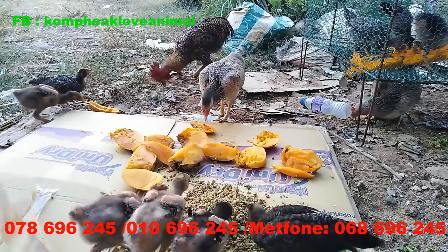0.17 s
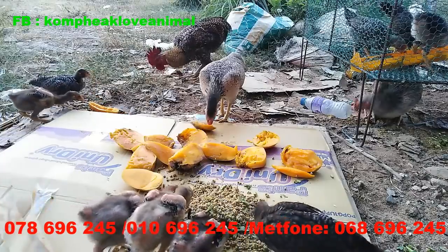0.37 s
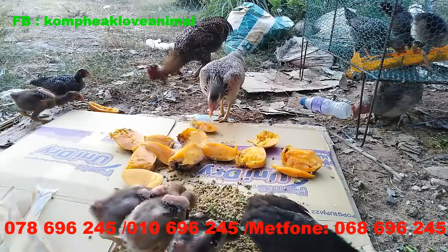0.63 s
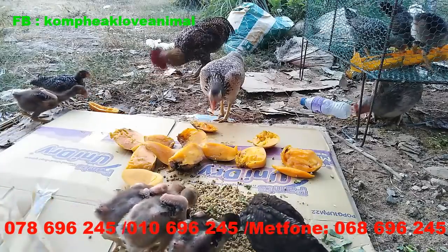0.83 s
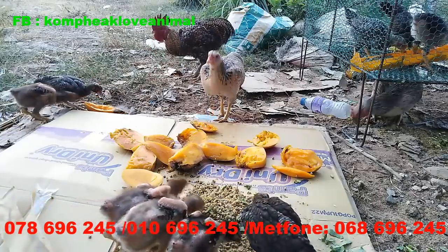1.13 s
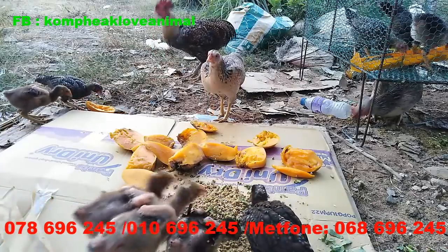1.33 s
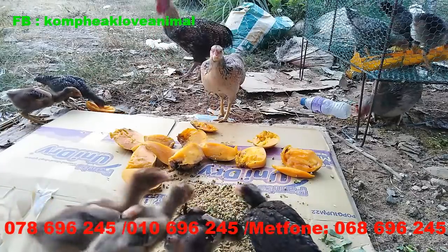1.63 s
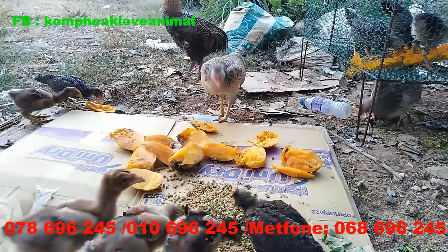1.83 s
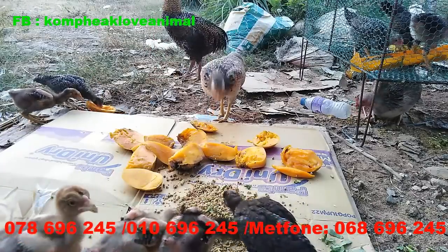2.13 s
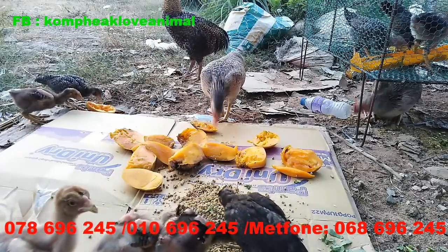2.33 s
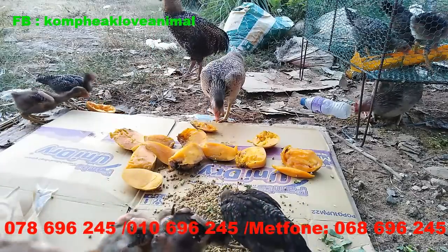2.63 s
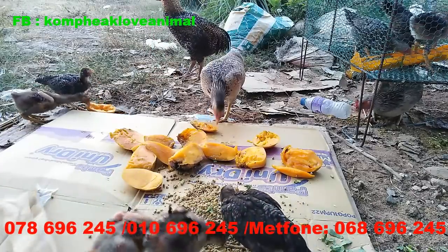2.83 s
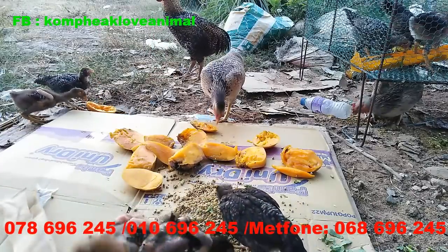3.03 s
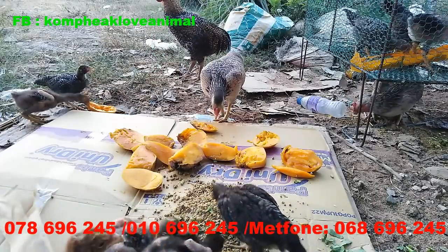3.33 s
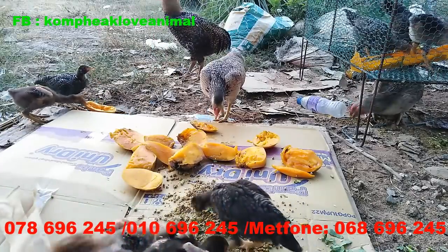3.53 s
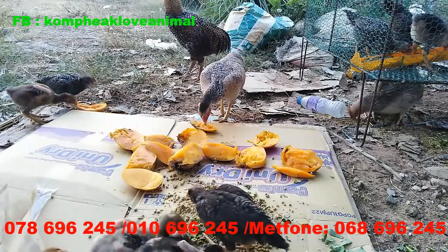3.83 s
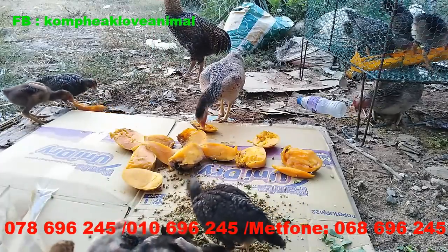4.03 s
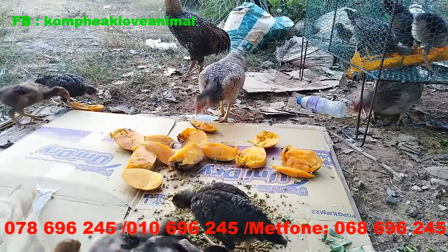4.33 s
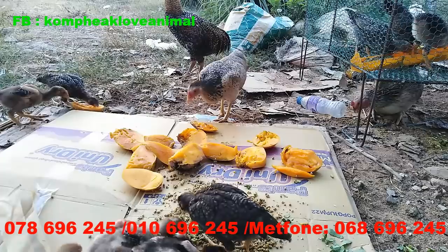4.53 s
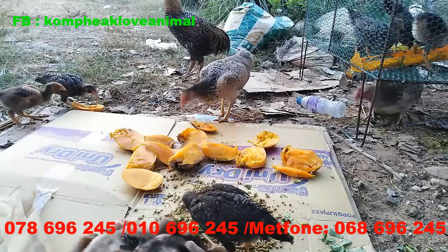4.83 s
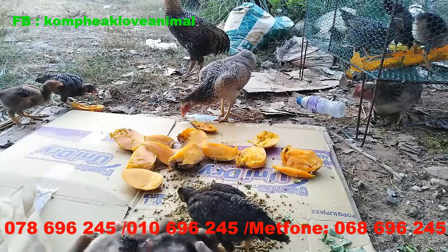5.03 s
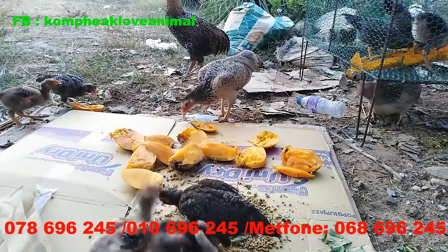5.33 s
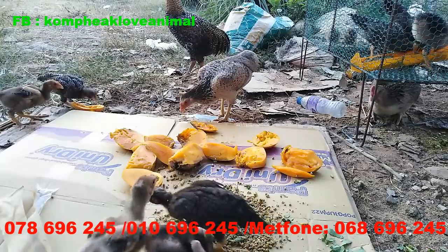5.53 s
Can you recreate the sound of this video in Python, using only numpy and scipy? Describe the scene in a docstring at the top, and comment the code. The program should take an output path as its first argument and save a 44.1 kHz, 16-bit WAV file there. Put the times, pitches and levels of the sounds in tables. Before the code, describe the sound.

Chickens feed on flattened cardboard outdoors, close to the microphone, over faint hiss and a barely audible distant motor. From the start, chicks give short, high peeps, many sliding downward, mostly a little to the right. Beaks knock hollowly on the card at uneven intervals from about 0.5 to 1.8 seconds, and dry pellets click and rattle, with the sharpest cracks near 1.3 and 1.5 seconds. After a slightly quieter moment, a burst of crunching and scattering feed comes at 2.8 seconds. The peeps then grow louder and more regular, and the pecking resumes from 3.2 seconds on. A foot lands on the sheet with a dull thump at about 4.2 seconds. A claw drags softly across the card around 5 seconds. Hens, only faint earlier, give several short clucks from 4.7 seconds to the end, near 5.7 seconds.

```python
"""Chickens feeding on cardboard

Chicks and hens feed on a flattened box outdoors, close to a stereo microphone. Beaks ring
the card's modes and crack dry pellets; feet boom the sheet and stir the feed; a claw drags
over the ribs. Chicks peep and hens cluck in short gliding tones. A far bird whines and a
distant motor hums under faint air."""
import sys
import numpy as np
from scipy import signal
from scipy.fft import rfft, irfft, next_fast_len
from scipy.io import wavfile
from scipy.ndimage import uniform_filter1d, map_coordinates

SR = 44100
rng = np.random.default_rng(int(sys.argv[2]) if len(sys.argv) > 2 else 0)


def unload_audio(sound):
    """Save the sound as a 16-bit wav file, at the path given as the first command line argument."""
    columns = np.transpose(np.atleast_2d(sound))
    # keep every value between -1 and 1, then stretch to whole-number steps
    steps = np.round(np.clip(columns, -1, 1) * 32767)
    wavfile.write(sys.argv[1], SR, steps.astype(np.int16))


N = 250488


def amp(db):
    return 10 ** (np.asarray(db) / 20)


def unit_rms(x):
    return x / np.sqrt(np.mean(x ** 2) + 1e-20)


def decay(t, t60_s):
    return amp(-60 * t / t60_s)


def along(points, hz):
    """Interpolate (f/Hz, value) points on a log axis."""
    f, v = np.transpose(points)
    return np.interp(np.log(hz + 1), np.log(f + 1), v)


def curves(rows):
    """Per-sample curve for each column after t/s."""
    s, *cols = np.transpose(rows)
    return [np.interp(np.arange(N) / SR, s, c) for c in cols]


def wobble(rate_hz, size=N):
    """Smooth random curve, knots at rate_hz."""
    knots = rng.standard_normal(int(size * rate_hz / SR) + 4)
    return map_coordinates(knots, [np.arange(size) * rate_hz / SR])


def filtered(x, response):
    """Apply the gain response(f/Hz)."""
    m = next_fast_len(N + SR // 2)
    return irfft(rfft(x, m) * response(np.fft.rfftfreq(m, 1 / SR)), m)[..., :N]


def place(out, s, x, pan_db):
    """Mix x in at time s, panned by level and delay; pan_db is left minus right."""
    lag = round(np.clip(5 - pan_db * 1.2, -12, 10))
    for side, sign in enumerate((1, -1)):
        part = out[side, round(s * SR) + max(sign * lag, 0):][:len(x)]
        part += amp(sign * pan_db / 2) * x[:len(part)]


def rush(spectrum, correlation, grain_db, patch_db, pan_db):
    """Stereo noise with millisecond grains and patches of colour; rms 1 before panning."""
    z = signal.stft(amp(grain_db * wobble(700)) * rng.standard_normal((2, N)), nperseg=256)[2]
    patches = uniform_filter1d(rng.standard_normal(z.shape[1:]), size=4, axis=0)
    patches = unit_rms(uniform_filter1d(patches, size=12, axis=1))
    pair = signal.istft(z * amp(patch_db * patches), nperseg=256)[1][:, :N]
    mid, side = filtered(pair, lambda hz: amp(along(spectrum, hz)))
    angle = np.arccos(correlation) / 2
    stereo = np.cos(angle) * mid + np.sin(angle) * np.outer([1, -1], side)
    return unit_rms(stereo) * amp([[pan_db / 2], [-pan_db / 2]])


def ring(modes, t):
    """Damped modes; level and tuning vary per blow."""
    return sum(amp(db + rng.normal(0, 2)) * decay(t, t60_s)
               * np.sin(2 * np.pi * hz * rng.normal(1, .06) * t) for hz, db, t60_s in modes)


def air():
    """Faint outdoor hiss."""
    # air spectrum: f/Hz, relative density/dB
    spectrum = [(200, 23), (1000, 22), (2800, 8.5), (14000, -22)]
    return amp(-80) * rush(spectrum, correlation=.19, grain_db=2.5, patch_db=5, pan_db=3.5)


def motor():
    """A far motor throbs: low noise of wavering level."""
    # hum envelope: t/s, level/dB
    envelope = [(0, -49.5), (.15, -64), (2.6, -62), (2.9, -54.5), (3.5, -59), (5.68, -65)]
    # hum spectrum: f/Hz, relative density/dB
    spectrum = [(20, -31), (70, -0.5), (95, 3.5), (125, -4.5), (250, -22.5), (450, -51)]
    throb = amp(curves(envelope)[0] + 3 * wobble(10))
    return throb * rush(spectrum, correlation=.8, grain_db=0, patch_db=0, pan_db=-4)


def far_bird():
    """A thin whine: wavering overtones, no fundamental."""
    # call contour: t/s, f/Hz, level/dB
    contour = [(2.26, 380, -94), (2.4, 405, -82), (2.53, 426, -85), (2.66, 432, -100)]
    # overtones: harmonic number, gain/dB
    overtones = [(3, 8), (4, 16), (5, 16)]
    hz, db = curves(contour)
    phase = 2 * np.pi * np.cumsum(hz * (1 + .018 * wobble(150))) / SR
    tone = sum(amp(gain_db + 6.5 * wobble(90)) * np.sin(k * phase) for k, gain_db in overtones)
    sounding = db > db[0]
    return sounding * amp(db) * tone * amp([[-2.5], [2.5]])


def claw_drag():
    """A claw catches and slips over the ribbed card."""
    # scrape spectrum: f/Hz, relative density/dB
    spectrum = [(150, -19.5), (400, 0.5), (850, -0.5), (1450, -8.5), (1900, 1), (2700, -27), (4500, -36)]
    start_s, end_s, rise_db_per_s, fall_db_per_s = 4.868, 5.24, 901, 209
    t = np.arange(N) / SR
    fade_db = rise_db_per_s * (start_s - t).clip(0) + fall_db_per_s * (t - end_s).clip(0)
    envelope = amp(-48.5 - fade_db + 1.5 * wobble(60))
    return envelope * rush(spectrum, correlation=.7, grain_db=3, patch_db=3.2, pan_db=-3)


def feed_rattle():
    """Feet and beaks sweep the feed: pellets rattle, single ones tick as they jump."""
    # sweeps: peak t/s, level/dB, 30 dB rise/s, 30 dB fall/s
    sweeps = [(0.002, -53, 0.0025, 0.17), (0.331, -46.5, 0.013, 0.13), (0.568, -48.5, 0.35, 0.74),
              (0.931, -46, 0.33, 0.17), (1.282, -55.5, 0.08, 0.079), (1.464, -47.5, 0.47, 0.07),
              (1.546, -42.5, 0.0078, 0.28), (1.773, -49.5, 0.014, 0.11), (2.057, -51, 0.038, 0.12),
              (2.261, -47, 0.44, 0.35), (2.824, -34.5, 0.074, 0.26), (2.986, -39, 0.24, 0.15),
              (3.119, -42, 0.048, 0.082), (3.257, -46, 0.32, 0.14), (3.414, -42.5, 0.047, 0.61),
              (3.821, -43, 0.048, 0.049), (3.944, -51, 0.092, 0.24), (4.174, -49.5, 0.0073, 0.23),
              (4.275, -38, 0.013, 0.11), (4.381, -42, 0.11, 0.12), (4.569, -53, 0.024, 0.34),
              (4.74, -49.5, 0.013, 0.059), (5.122, -52.5, 0.012, 0.21), (5.349, -41, 0.0084, 0.16),
              (5.49, -49.5, 0.011, 1), (5.625, -42.5, 0.059, 0.11)]
    # pellet spectrum: f/Hz, relative density/dB
    spectrum = [(180, -47), (300, -9.5), (1100, -11), (4910, -2.5), (13800, -12.5)]
    ticks_per_s, tick_db, spread_db, highpass_hz = 90, -5.5, 4.5, 3000
    t = np.arange(N) / SR
    power = sum(amp(db - 30 * np.maximum((s - t) / rise_s, (t - s) / fall_s)) ** 2
                for s, db, rise_s, fall_s in sweeps)
    jumps = rng.random(N) < ticks_per_s / SR
    jumps = jumps * amp(tick_db + spread_db * rng.exponential(size=N).clip(0, 3))
    bursts = signal.fftconvolve(jumps, decay(t[:SR // 40], t60_s=.008))[:N]
    ticks = bursts * (rng.standard_normal(N) + .72 * rng.standard_normal((2, N)))
    ticks = filtered(ticks, lambda hz: amp(along(spectrum, hz)) * (1 - 1 / (1 + (hz / highpass_hz) ** 4)))
    shiver = amp(3.5 * wobble(55))
    rattle = shiver * rush(spectrum, correlation=.15, grain_db=.5, patch_db=4, pan_db=-2.5)
    return np.sqrt(power) * (rattle + 3 * ticks * amp([[-1.5], [1.5]]))


def pellet_clicks():
    """A pellet cracks: brief ring, broad snap, crunch of crumbs; brighter ones lie further right."""
    # cracks: t/s, level/dB, f/Hz
    cracks = [(0.3366, -23, 7500), (0.451, -68, 11980), (0.61, -24.5, 6800), (0.6784, -24, 4660),
              (0.728, -23.5, 5130), (0.879, -35.5, 7100), (1.3421, -10.5, 9300), (1.5273, -35, 7140),
              (1.545, -13, 5900), (1.549, -20, 5500), (1.574, -25, 6500), (1.621, -32.5, 8000),
              (1.723, -30, 6660), (2.025, -38, 4970), (2.0477, -30, 7560), (2.742, -32, 4590),
              (2.809, -27, 4370), (2.8358, -14.5, 4460), (2.8506, -20, 4160), (2.8637, -15.5, 4140),
              (3.4154, -28.5, 6630), (3.635, -26.5, 6530), (3.822, -28, 6030), (3.9503, -26, 6990),
              (4.275, -27, 4140), (5.2733, -34.5, 6900), (5.352, -18, 7030), (5.4904, -38, 5280)]
    out, t = np.zeros((2, N)), np.arange(SR // 40) / SR
    for s, db, hz in cracks:
        tone = np.sin(2 * np.pi * hz * t)
        snap = .4 * np.diff(rng.standard_normal(len(t) + 1))
        crack = amp(db) * decay(t, t60_s=.003) * (tone + snap)
        crumbs = uniform_filter1d(rng.standard_normal(len(t)), size=8)
        crunch = amp(-35) * decay(t, t60_s=.038) * tone * crumbs
        place(out, s, crack + crunch, pan_db=7 - hz / 500)
    return out


def footsteps():
    """A landing foot booms the whole sheet."""
    # landings: t/s, level/dB
    landings = [(3.421, -39), (4.176, -28.5)]
    # whole-sheet modes: f/Hz, gain/dB, t60/s
    sheet_modes = [(144, -16, 0.23), (213, 0, 0.087), (280, -2, 0.12)]
    out, t = np.zeros((2, N)), np.arange(SR // 6) / SR
    attack = 1 - np.exp(-t / .0033)
    for s, db in landings:
        place(out, s, amp(db) * ring(sheet_modes, t) * attack, pan_db=-1.5)
    return out


def beak_knocks():
    """A blow rings the low box modes; hardness adds panel modes and a dry puff."""
    # blows: t/s, relative level/dB, hardness/dB
    blows = [(0.499, -24.5, -5.5), (0.858, -32, -9), (0.908, -27, -1), (0.934, -31.5, -1.5),
             (1.013, -33, 5), (1.266, -62.5, 19.5), (1.415, -37.5, -9), (1.778, -35.5, -1),
             (3.197, -30, -6.5), (3.422, -45, 18), (3.63, -32.5, -8.5), (3.828, -44.5, -29),
             (4.138, -33, -6.5), (4.176, -27, 2), (4.377, -39, 10.5), (4.686, -41, 0.5),
             (4.763, -33.5, 8.5), (4.843, -45, -12), (4.972, -44.5, 12), (5.397, -32.5, -10)]
    # low card modes: f/Hz, gain/dB, t60/s
    box_modes = [(365, 0, .06), (440, -2, .075), (290, -10, .05)]
    # higher panel modes: f/Hz, gain/dB, t60/s
    panel_modes = [(720, 0, .025), (1090, 2, .025), (1500, 0, .02), (2000, -3, .015)]
    out, t = np.zeros((2, N)), np.arange(SR // 6) / SR
    attack = 1 - np.exp(-t / .0006)
    for s, db, hard_db in blows:
        puff = amp(6) * decay(t, t60_s=.02) * uniform_filter1d(rng.standard_normal(len(t)), size=7)
        knock = ring(box_modes, t) + amp(hard_db - 2) * (ring(panel_modes, t) + puff)
        place(out, s, amp(db - 3) * knock * attack, pan_db=-1.5)
    highpass_hz = 170  # a beak is too light to move the whole sheet
    return filtered(out, lambda hz: (1j * hz / (highpass_hz + 1j * hz)) ** 2)


def distant(note):
    """A far call arrives mostly as reflections."""
    t = np.arange(SR // 4) / SR
    response = rng.standard_normal(len(t)) * decay(t, t60_s=.1)
    response *= .44 / np.linalg.norm(response)
    response[0] = .4  # direct path
    return signal.fftconvolve(note, response)


def call(length_s, start_hz, end_hz, sag_hz, overtones_db, flutter_db, jitter, rasp, peak_at):
    """A whistled glide that swells, flutters and fades; rasp spreads noise around each partial."""
    n = round(length_s * SR)
    u = np.linspace(0, 1, n)
    hz = start_hz + (end_hz - start_hz) * u - 4 * sag_hz * u * (1 - u)
    hz -= .8 * max(start_hz - end_hz, 0) * np.exp(-u * length_s / .002)  # falling notes flick up first
    phase = 2 * np.pi * np.cumsum(hz * (1 + jitter * wobble(305.7, n))) / SR
    tone = np.sin(phase) + sum(amp(db) * np.sin(k * phase) for k, db in enumerate(overtones_db, 2))
    tone *= 1 + rasp * wobble(1400, n)
    swell = np.sin(np.pi / 2 * np.interp(u, [0, peak_at, 1], [0, 1, 0])) ** .7
    flutter = amp(flutter_db * (wobble(80, n) + wobble(450, n)))
    return np.sqrt(2) * swell * flutter * tone


def hens():
    """Low clucks that make most of their glide early."""
    # clucks: t/s, length/s, start f/Hz, end f/Hz, level/dB
    clucks = [(1.152, 0.041, 1073, 1060, -55.5), (3.05, 0.088, 958, 934, -61), (3.887, 0.14, 942, 960, -56),
              (3.935, 0.013, 840, 850, -45.5), (4.732, 0.0374, 1326, 999, -29),
              (5.026, 0.094, 860, 880, -48.5), (5.149, 0.033, 1220, 1162, -45),
              (5.363, 0.03, 1603, 1092, -33), (5.516, 0.028, 1510, 1494, -38),
              (5.569, 0.065, 1173, 1120, -36.5), (5.589, 0.052, 730, 697, -56.5)]
    out = np.zeros((2, N))
    for s, length_s, start_hz, end_hz, db in clucks:
        sag_hz = .353 * (start_hz - end_hz)
        note = call(length_s, start_hz, end_hz, sag_hz, overtones_db=[-24, -20],
                    flutter_db=2.4, jitter=.025, rasp=.18, peak_at=.6)
        place(out, s, amp(db) * note, pan_db=-1.5)
    return out


def chicks():
    """High peeps; the lowest and shrillest waver more, the shrillest come from across the pen."""
    # peeps: t/s, length/s, start f/Hz, end f/Hz, mid-note sag/Hz (negative arches), level/dB, pan/dB
    peeps = [(0.045, 0.042, 2506, 2530, 4, -52.5, -6), (0.243, 0.023, 2770, 2340, 75, -43, -4),
             (0.555, 0.039, 2750, 2970, 230, -42.5, 0.2), (0.69, 0.051, 2820, 3160, 512, -42.5, 1.5),
             (0.845, 0.042, 4010, 3080, 500, -41.5, 1.4), (0.935, 0.03, 2750, 2750, -450, -34, -5.5),
             (0.953, 0.034, 3040, 2890, 684, -33, -9.5), (0.99, 0.02, 3830, 3660, -3.5, -40, -2.5),
             (1.084, 0.051, 4900, 2920, -100, -49, -3), (1.41, 0.079, 4620, 3635, 70, -39.5, -4),
             (1.95, 0.063, 2739, 3070, 199, -45, -6.5), (2.17, 0.049, 5880, 3910, -120, -42.5, 12.5),
             (2.405, 0.057, 2700, 2780, 382, -49, -7), (2.435, 0.045, 3550, 4120, 606, -47.5, -3),
             (0.884, 0.014, 3290, 2570, 0, -44, 2), (2.846, 0.045, 4045, 2770, 152, -35, -4),
             (2.967, 0.046, 4080, 2730, 191.5, -39, -4.5), (3.086, 0.062, 4440, 2755, 202, -36, -3.5),
             (3.228, 0.094, 4576, 2764, 904, -36, -5.5), (3.372, 0.065, 2950, 2970, 337, -41, -10.5),
             (3.51, 0.051, 5880, 3990, 154, -34.5, 6), (3.583, 0.0338, 3290, 2490, -82, -37, -4.5),
             (3.67, 0.046, 2370, 2280, 40, -39.5, 0.5), (3.694, 0.033, 1913, 2920, -650, -32.5, -0.5),
             (4.028, 0.029, 2340, 2220, 6, -48, -3), (4.035, 0.035, 3040, 2450, 0, -41.5, -3),
             (4.186, 0.048, 4150, 2880, 253, -38, -7.5), (4.35, 0.05, 3654, 2958, 345, -36.5, -5),
             (4.56, 0.05, 5390, 3790, -56, -36.5, 6), (4.99, 0.044, 4130, 2830, 83, -43.5, -0.5),
             (5.498, 0.027, 2330, 1940, 60, -42.5, -9)]
    hoarse_below_hz, far_above_hz = 2720, 5000
    out = np.zeros((2, N))
    for s, length_s, start_hz, end_hz, sag_hz, db, pan_db in peeps:
        far = start_hz > far_above_hz
        roughness = 3 if far or start_hz < hoarse_below_hz else 1
        note = amp(db) * call(length_s, start_hz, end_hz, sag_hz, overtones_db=[-23, -31],
                              flutter_db=2.6, jitter=.013 * roughness, rasp=.16 * roughness, peak_at=.45)
        place(out, s, distant(note) if far else note, pan_db)
    return out


def yard_echo(x):
    """Ground and pen scatter the sound back; treble dies first."""
    # yard decay: f/Hz, t60/s
    decay_times = [(300, 0.45), (2500, 0.35), (10000, 0.021)]
    hz, t, z = signal.stft(rng.standard_normal((2, SR // 3)), SR, nperseg=256)
    tail = signal.istft(z * decay(t, along(decay_times, hz)[:, None]), SR, nperseg=256)[1]
    delayed = np.pad(x, ((0, 0), (200, 0)))
    return signal.fftconvolve(delayed, tail / np.linalg.norm(tail[0]), axes=1)[:, :N]


def scene():
    voices = chicks() + hens()
    taps = beak_knocks() + footsteps() + pellet_clicks()
    echo = yard_echo(amp(-17) * voices + amp(-14) * taps)
    return voices + taps + echo + feed_rattle() + claw_drag() + far_bird() + motor() + air()


def record(dry):
    """The microphone rolls off above 14 kHz, up to a hard band limit."""
    rolloff = [(14300, 0), (15000, -20), (16400, -34)]  # f/Hz, gain/dB
    limit_hz = 16500
    return filtered(dry, lambda hz: amp(along(rolloff, hz)) * (hz < limit_hz))


dry = scene()
out = record(dry)
unload_audio(out)
```